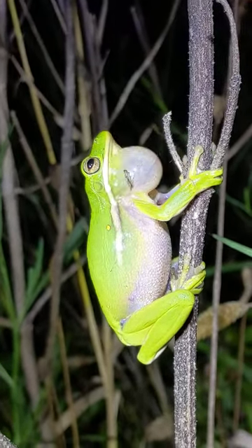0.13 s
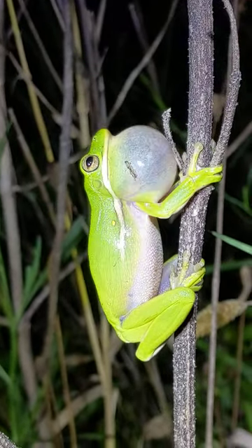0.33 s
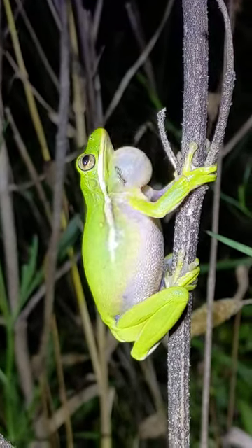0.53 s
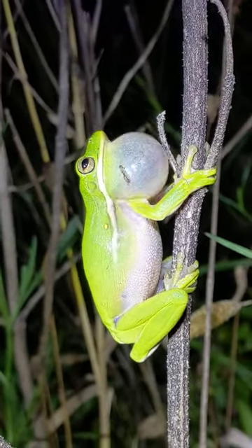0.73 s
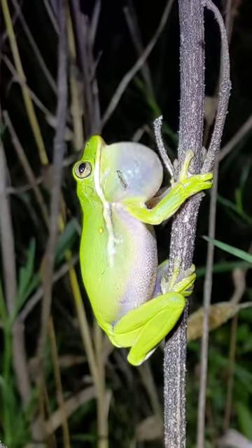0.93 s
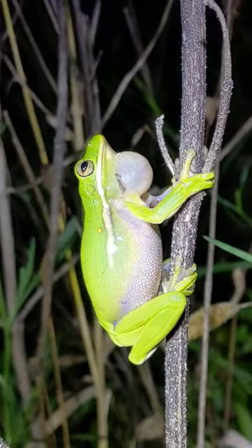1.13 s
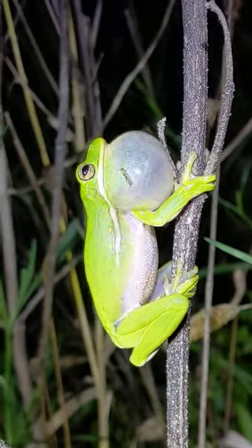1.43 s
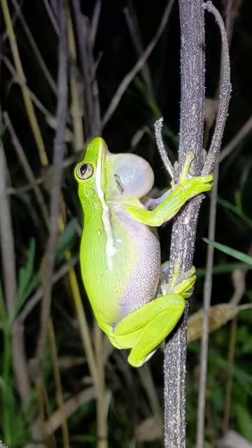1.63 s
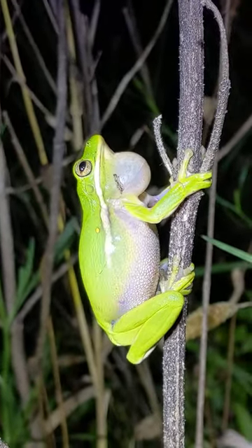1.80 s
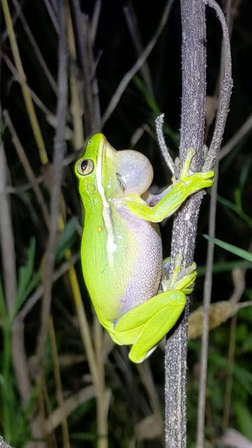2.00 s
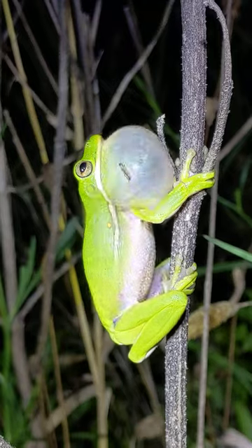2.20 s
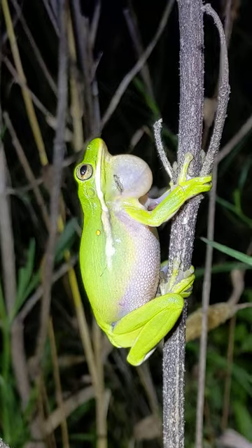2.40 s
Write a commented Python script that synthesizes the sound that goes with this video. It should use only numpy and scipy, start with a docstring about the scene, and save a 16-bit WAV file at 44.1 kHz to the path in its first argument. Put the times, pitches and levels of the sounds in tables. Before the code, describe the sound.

Close stereo pickup outdoors at night: four loud, rough frog honks, evenly spread, over a hissing far chorus and low rumble, with faint insect rasps, a distant rising chuckle, a weaker neighbour's call and a tiny tick.

```python
"""First comes a marsh's wash and the end of a neighbour's call, then a green tree frog honks four times close by.
Each honk is a train of larynx pulses that locks to every third cycle of a 1 kHz ring, coloured by the vocal sac.
The neighbour calls again later; another frog chuckles in quick rising notes, and one small tick sounds.
Bands of noise make the insect rasps and the wash of the far chorus.
A gain control ducks the marsh after each honk, and the very highest sounds are cut."""
import sys
import numpy as np
from scipy import signal
from scipy.fft import rfft, irfft
from scipy.io import wavfile
from scipy.ndimage import uniform_filter1d

SR = 44100
rng = np.random.default_rng(int(sys.argv[2]) if len(sys.argv) > 2 else 0)


def wav_record(signal):
    """Record a signal, one row per channel, as 16-bit PCM in the file named by sys.argv[1]."""
    frames = np.transpose(np.atleast_2d(signal))
    bounded = np.clip(frames, -1, 1)
    # unit amplitude maps onto the largest positive 16-bit level
    quanta = np.round(bounded * 32767).astype(np.int16)
    wavfile.write(sys.argv[1], SR, quanta)


N = 112454
T = np.arange(N) / SR
SIZE = 2 ** 17   # length of the Fourier transforms, in samples
HZ = np.maximum(np.arange(SIZE // 2 + 1) * SR / SIZE, 1)

FROG_LAG_S = 0.00021265   # the right side hears the frog later
WHEEZE_DELAY_S, WHEEZE_WIDTH_S = .103, .018
WHEEZE_HZ, WHEEZE_OCTAVES, WHEEZE_DB = 14400, .07, -54.5
REEDS_DB = -21
# the near frog's honks: (first pulse t/s, length t/s, ring f/Hz, pulse level/dB before fading, settling t/s)
NEAR_HONKS = [(0.2268, 0.14675, 1013, 29.5, .014), (0.767, 0.13365, 1011, 30.5, .0145),
              (1.3894, 0.14707, 1016, 29.5, .017), (2.12, 0.1418, 1015, 31, .0135)]
# what its vocal sac radiates above the ring: (f/Hz, level/dB)
NEAR_SAC = [(100, -73.5), (600, -41.5), (1000, -34), (1350, -6.5), (1690, -13.5), (2020, -30.5),
            (2360, -15), (2700, -3), (3030, -8), (3370, -7), (3700, -15.5), (4040, -25), (4400, -19),
            (4730, -20), (5400, -40.5), (5900, -37.5), (6700, -47.5), (7100, -15), (7750, -37.5),
            (8400, -46.5), (9300, -42), (11000, -64.5), (16000, -61)]
# how the frog leans to the left or right: (f/Hz, left minus right level/dB)
NEAR_BALANCE = [(500, 6), (1000, 0.5), (1700, 1), (2020, 4), (2400, -9), (3000, 1.5), (3400, 1),
                (4050, -7.5), (4400, 6.5), (4800, -2.5), (6000, 16.5), (7300, 1.5), (10000, 3.5)]


def near_frog():
    """The close honks, a thin noisy wheeze late in each, and their scatter from the reeds."""
    voice = tree_frog(NEAR_HONKS, NEAR_SAC)
    wheeze_shape = sum(swell(honk[0] + WHEEZE_DELAY_S, WHEEZE_WIDTH_S) for honk in NEAR_HONKS)
    wheeze = from_db(WHEEZE_DB) * hiss(WHEEZE_HZ, WHEEZE_OCTAVES)[0] * wheeze_shape
    direct = place(voice, FROG_LAG_S, at_hz(NEAR_BALANCE))
    return direct + wheeze + from_db(REEDS_DB) * reeds(voice)


RING_DB, RING_WIDTH_HZ, RING_SKIRT_HZ, RING_LOW_CUT_HZ = -3, 125.5, 785.2, 896.1
RING_BUILD, SAC_BUILD = 1, -0.18   # after a longer pause the ring is driven harder, the sac more gently
CRACKLE_DB, CRACKLE_DELAY_S = -4.5, .004   # a slack larynx adds stray pulses, at most this late
THUD_FROM_S, THUD_UNTIL_S, THUD_DB = .026, .052, -33
# faint random low thuds under some early pulses, as from overloaded peaks: (f/Hz, level/dB)
THUD_COLOUR = [(40, -9.5), (130, -7), (250, -3), (500, -2.5), (900, 0), (4000, -37)]


def tree_frog(calls, sac):
    """Pulses drive a low ring and the sac; a faint random low thud lies under some early pulses."""
    rows = [row for call in calls for row in pulses(*call)]
    s, age, strength, pause, slackness = np.transpose(rows)
    ring_hz = np.mean([call[2] for call in calls])

    # the tiny offset keeps the filters from fading into extremely small numbers
    drive = clicks(s, strength * pause ** RING_BUILD) + 1e-18
    ring = signal.lfilter(*signal.iirpeak(ring_hz, ring_hz / RING_WIDTH_HZ, fs=SR), drive)
    band = signal.butter(5, [RING_LOW_CUT_HZ, 2600], "band", fs=SR, output="sos")
    ring = signal.sosfilt(band, ring)
    ring = signal.lfilter(*signal.iirpeak(ring_hz, ring_hz / RING_SKIRT_HZ, fs=SR), ring)

    stray_times = s + CRACKLE_DELAY_S * rng.random(len(s))
    stray = clicks(stray_times, strength * slackness * rng.standard_normal(len(s)))
    crackle = from_db(CRACKLE_DB) * colour(stray, sac)
    upper = vocal_sac(s, strength * pause ** SAC_BUILD, slackness, sac)

    early = (age > THUD_FROM_S) * (age < THUD_UNTIL_S)
    thud_clicks = clicks(s, strength * rng.standard_normal(len(s)) * early)
    low_thuds = from_db(THUD_DB) * colour(thud_clicks, THUD_COLOUR)
    return from_db(RING_DB) * ring + upper + crackle + low_thuds


LOCK_CYCLES, START_SLACK_CYCLES, END_SLACK_CYCLES = 3, 6, 2   # ring cycles per pulse, and extra ones
LOOSE_END_S = .016   # the pulses unlock this long before the end
ATTACK_S, RELEASE_S, FADE_DB_PER_S = 0.02006, 0.012, 26.5
ARCH_TOP_S, SCOOP_HZ_PER_S, SAG_HZ_PER_S = .04, 560, 139.5   # pitch rises to the arch top, then sags
JITTER_S, ROUGH_JITTER_S, SHIMMER_DB = 2e-6, 2.4e-5, .3   # random wobble in timing and level
CLEAN_FROM_S, CLEAN_UNTIL_S = .05, .086   # between these ages the timing is steadier
# the larynx catches briefly: timing and level vary more
HITCH_S, HITCH_WIDTH_S, HITCH_DB = .096, 0.0013, 8.5
INFLATE_S, DEFLATE_S = 0.0507, 0.01978   # the sac fills, and slackens at the end


def pulses(start, length, ring_hz, db, settle_s):
    """Rows (t/s, age t/s, strength, relative pause, slackness): whole ring cycles apart, slow, then locked."""
    t, rows = 0, []
    chance = rng.standard_normal((100, 2))
    while t < length:
        left = length - t
        extra = round(START_SLACK_CYCLES / (1 + (t / settle_s) ** 3))
        cycles = LOCK_CYCLES + extra + END_SLACK_CYCLES * (t > length - LOOSE_END_S)
        attack = min(1, (t + 0.00294) / ATTACK_S) ** 0.665
        effort = attack * min(1, left / RELEASE_S) ** .5
        jitter = JITTER_S if CLEAN_FROM_S < t < CLEAN_UNTIL_S else ROUGH_JITTER_S
        hitch = np.exp(-.5 * ((t - HITCH_S) / HITCH_WIDTH_S) ** 2)
        time_chance, level_chance = chance[len(rows)]
        pulse_s = start + t + jitter * (1 + hitch) * time_chance
        level_db = db - FADE_DB_PER_S * t + (SHIMMER_DB + HITCH_DB * hitch) * level_chance
        slackness = min(max(0, 1 - t / INFLATE_S, 0.39 * (1 - left / DEFLATE_S)), 1)
        rows.append((pulse_s, t, effort * from_db(level_db), cycles / LOCK_CYCLES, slackness))
        scoop = SCOOP_HZ_PER_S * max(ARCH_TOP_S - t, 0)
        sag = SAG_HZ_PER_S * max(t - ARCH_TOP_S, 0)
        t += cycles / (ring_hz - scoop - sag)
    return rows


SLACK_DROP_OCTAVES = 0.696   # a slack sac sounds lower
SLACK_DB, SLACK_DULL_DB_PER_OCTAVE = 1, -7   # slightly stronger, but duller above 2 kHz
# how far each region drops: (f/Hz, share of the full drop)
DROP_SHARE = [(1100, 0), (2400, 0.995), (3000, 0.977), (4400, .3), (5400, 0.134)]


def vocal_sac(s, strength, slackness, sac, count=7):
    """Each pulse takes the colour of the sac at that moment: its resonances rise as it fills."""
    out = 0
    for stage in np.linspace(0, 1, count):   # blend between neighbouring stages of slackness
        share = np.maximum(0, 1 - abs(slackness - stage) * (count - 1))
        slackened = []
        for hz, db in sac:
            drop = SLACK_DROP_OCTAVES * stage * np.interp(hz, *np.transpose(DROP_SHARE))
            dulling = SLACK_DULL_DB_PER_OCTAVE * max(0, np.log2(hz / 2000))
            slackened.append((hz * 2 ** -drop, db + stage * (SLACK_DB + dulling)))
        out = out + colour(clicks(s, strength * share), sorted(slackened))
    return out


NEIGHBOUR_LAG_S, FAR_REEDS_DB = 0.0001467, 1.5   # the right side hears it later
# the neighbour's calls: (first pulse t/s, length t/s, ring f/Hz, pulse level/dB before fading, settling t/s)
NEIGHBOUR_CALLS = [(-.06, 0.1164, 833.2, -1, .008), (1.979, 0.0813, 840, 6.5, .008)]
# what its vocal sac radiates above the ring: (f/Hz, level/dB)
NEIGHBOUR_SAC = [(100, -60.5), (700, -38.5), (1100, -10), (1400, -17.5), (1650, -9), (1930, -21),
                 (2250, -12), (3000, -10.5), (4200, -32), (6000, -35.5), (16000, -53.5)]


def neighbour():
    """A lower tree frog some way off, with strong scatter from the reeds."""
    voice = tree_frog(NEIGHBOUR_CALLS, NEIGHBOUR_SAC)
    direct = place(voice, NEIGHBOUR_LAG_S, balance_db=-1.0)
    return direct + from_db(FAR_REEDS_DB) * reeds(voice)


NOTE_HZ, AFTERNOTE_S, AFTERNOTE_HZ, AFTERNOTE_DB = 1302.9, 0.021, 1569.8, -7
# rising notes of a distant chuckle: (t/s, level/dB)
CHUCKLE_NOTES = [(1.086, -50.5), (1.127, -49.5), (1.165, -50), (1.197, -43), (1.229, -44), (1.262, -41.5),
                 (1.297, -43.5), (1.332, -44), (1.366, -39)]


def chuckling_frog():
    """A quickly repeated note that mostly grows louder, each with a weaker, higher afternote."""
    voice = 0
    for s, db in CHUCKLE_NOTES:
        afternote = from_db(AFTERNOTE_DB) * chirp(s + AFTERNOTE_S, AFTERNOTE_HZ)
        voice = voice + from_db(db) * (chirp(s, NOTE_HZ) + afternote)
    return pan(db=-6) * voice + reeds(voice)


NOTE_RISE_HZ_PER_S, NOTE_WIDTH_S, NOTE_OCTAVE_DB = 26000, 0.00493, -4.5


def chirp(s, hz):
    """One short upward glide with its octave."""
    phase = 2 * np.pi * (T - s) * (hz + .5 * NOTE_RISE_HZ_PER_S * (T - s))
    return swell(s, NOTE_WIDTH_S) * (np.sin(phase) + from_db(NOTE_OCTAVE_DB) * np.sin(2 * phase))


INSECT_PAN_DB = 8.5   # left minus right
TRILL_HZ, TRILL_OCTAVES, TRILL_DB = 8600, .012, -75
# insect rasps: (middle t/s, width t/s, centre f/Hz, width [octaves], level/dB)
INSECT_RASPS = [(0.018, 0.022, 9830, 0.26, -72.5), (.16, 0.0191, 12680, 0.287, -57.5),
                (0.536, 0.0366, 9430, 0.248, -56), (.78, 0.037, 9140, 0.28, -56),
                (2.389, .008, 12190, 0.36, -54)]


def insects():
    """Brief high rasps and one thin, lasting trill, to the left, all made from bands of noise."""
    rasps = 0
    for s, width, hz, octaves, db in INSECT_RASPS:
        rasps = rasps + from_db(db) * swell(s, width) * hiss(hz, octaves)
    trill = from_db(TRILL_DB) * hiss(TRILL_HZ, TRILL_OCTAVES)
    return pan(INSECT_PAN_DB) * (rasps + trill)


TICK_S, TICK_DB = 2.053, -12
# colour of one small tick in the reeds: (f/Hz, level/dB)
TICK_COLOUR = [(60, -35), (400, 6), (2500, 13), (4000, -11), (16000, -26.5)]


def reed_tick():
    """One click, coloured by a filter and equal on both sides."""
    return colour(clicks(np.array([TICK_S]), [-from_db(TICK_DB)]), TICK_COLOUR)


MARSH_DB, MARSH_SWAY_DB, MARSH_SWAY_HZ = -44.5, 0.5, 14
# far chorus and night air: (f/Hz, relative level/dB per Hz)
MARSH_COLOUR = [(20, -7), (55, -1), (120, -4), (250, -14), (450, -20.5), (650, -22.5), (820, -17),
                (950, -20), (1280, -5), (1600, -12.5), (2000, -3), (2550, -2.5), (2900, 1.5), (3250, 3),
                (3800, -6), (4700, -1), (5800, -8), (6900, -23), (8500, -25.5), (15500, -22)]
# how alike the two sides of the wash are: (f/Hz, likeness [-1 to 1])
SIDE_LIKENESS = [(60, 1), (200, 0.29), (480, .49), (950, .23), (1890, -0.138), (15000, 0.078)]
# how the wash leans to the left or right: (f/Hz, left minus right level/dB)
WASH_BALANCE = [(100, -1), (2500, 0), (3700, 4), (4800, -4.5), (5900, -3.5), (7000, -4.5), (9000, 9),
                (15000, 5)]


def marsh():
    """Coloured noise for countless merged far callers: a gently swaying wash over a low rumble."""
    mid, side = rfft(rng.standard_normal((2, SIZE)))
    alike = np.clip(at_hz(SIDE_LIKENESS), -1, 1)
    both = np.sqrt(1 + alike) * mid + np.sqrt(1 - alike) * side * [[1], [-1]]
    spectrum = both * from_db(at_hz(MARSH_COLOUR)) * pan(at_hz(WASH_BALANCE))
    wash = rms_one(irfft(spectrum)[:, :N])
    return wash * from_db(MARSH_DB + MARSH_SWAY_DB * hiss(MARSH_SWAY_HZ, 1))


REEDS_T60_S = 0.15   # time for the scatter to fall by 60 dB


def reeds(x):
    """Diffuse scatter from the vegetation: a fading noise tail on each side."""
    tail = rng.standard_normal((2, SR // 2)) * from_db(-60 * T[:SR // 2] / REEDS_T60_S)
    return signal.fftconvolve(x[None], tail / np.sqrt(np.sum(tail ** 2) / 2), axes=1)[:, :N]


def place(x, lag_s, balance_db):
    """Spread a source over two microphones by level and by a delay on the right."""
    delay = np.exp(-2j * np.pi * HZ * np.array([[0], [lag_s]]))
    return irfft(rfft(x, SIZE) * pan(balance_db) * delay)[:, :N]


def pan(db):
    """Left and right gains for a level difference."""
    return from_db(np.array([[.5], [-.5]]) * db)


def colour(x, points):
    """Filter with the given (f/Hz, level/dB) response that never sounds before its input."""
    cepstrum = irfft(np.log(from_db(at_hz(points))))
    # folding the cepstrum forward in time gives the minimum-phase filter
    cepstrum[1:SIZE // 2] *= 2
    cepstrum[SIZE // 2 + 1:] = 0
    return irfft(rfft(x, SIZE) * np.exp(rfft(cepstrum)))[..., :N]


def clicks(times, strengths):
    """Clicks placed between the samples, each a short windowed sinc."""
    out, taps = np.zeros(N), np.arange(-12, 13)
    for s, strength in zip(times * SR, strengths):
        at = int(s) + taps
        if at[0] >= 0 and at[-1] < N:
            out[at] += strength * np.sinc(at - s) * np.hanning(len(taps))
    return out


def hiss(hz, octaves):
    """Stereo noise in one bell-shaped band, at unit rms."""
    band = np.exp(-.5 * (np.log2(HZ / hz) / octaves) ** 2)
    return rms_one(irfft(rfft(rng.standard_normal((2, SIZE))) * band)[:, :N])


def swell(s, width_s):
    """A bell-shaped envelope."""
    return np.exp(-.5 * ((T - s) / width_s) ** 2)


def at_hz(points):
    """A table read on the log-frequency axis."""
    hz, value = np.transpose(points)
    return np.interp(np.log(HZ), np.log(hz), value)


def rms_one(x):
    """Scale to unit rms."""
    return x / np.sqrt(np.mean(x ** 2) + 1e-20)


def from_db(db):
    """Decibels to gain."""
    return 10 ** (np.asarray(db) / 20)


def scene():
    """All the callers, the tick and the marsh."""
    return near_frog() + neighbour() + chuckling_frog() + insects() + reed_tick() + marsh()


THRESHOLD_DB, SQUEEZE = -21, .5   # dB of ducking for each dB above the threshold
GAIN_ATTACK_S, RECOVERY_DB_PER_S, CUTOFF_HZ = .012, 6, 15750


def record(dry):
    """Gain control with a quick attack and slow recovery, then the top is cut."""
    power = uniform_filter1d(np.mean(dry ** 2, axis=0), size=256)
    level_db = 10 * np.log10(np.maximum(power, 1e-12))
    over = SQUEEZE * np.maximum(level_db - THRESHOLD_DB, 0)
    # hold each peak of the ducking, and let it go at the recovery rate
    held = np.maximum.accumulate(over + RECOVERY_DB_PER_S * T) - RECOVERY_DB_PER_S * T
    r = np.exp(-1 / (GAIN_ATTACK_S * SR))
    ducked = dry * from_db(-signal.lfilter([1 - r], [1, -r], held))
    top_cut = np.clip((CUTOFF_HZ - HZ) / 100 + .5, 0, 1)
    return irfft(rfft(ducked, SIZE) * top_cut)[:, :N]


dry = scene()
out = record(dry)
wav_record(out)
```